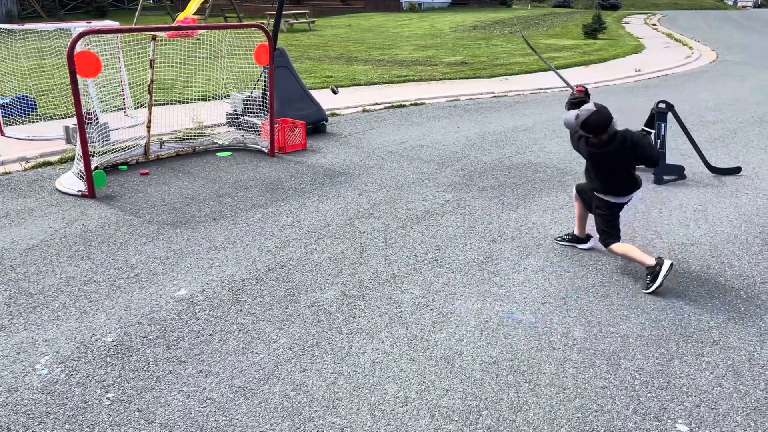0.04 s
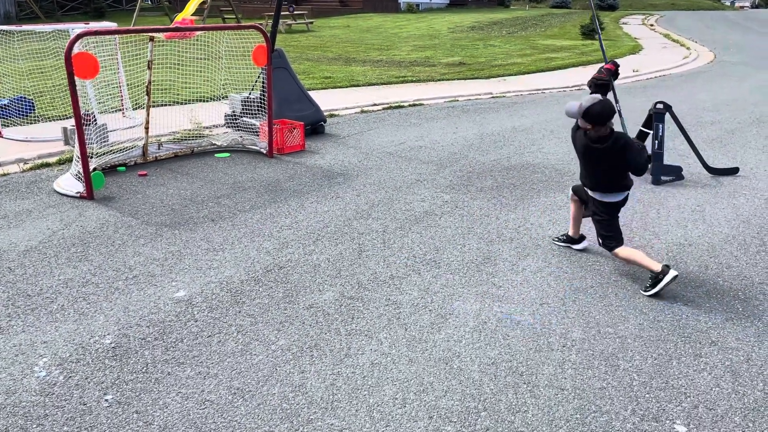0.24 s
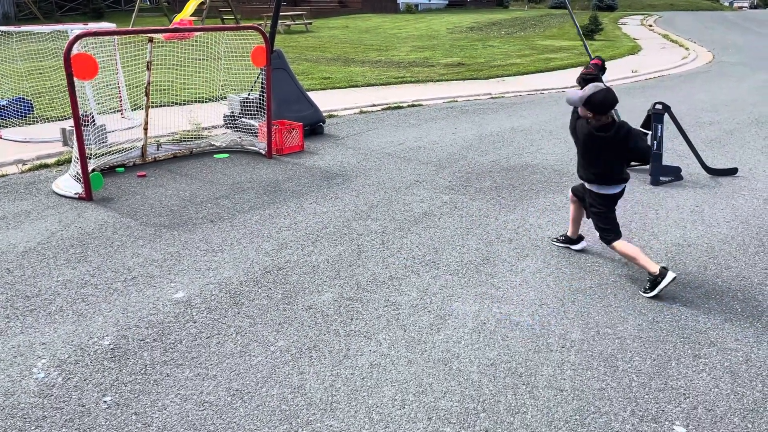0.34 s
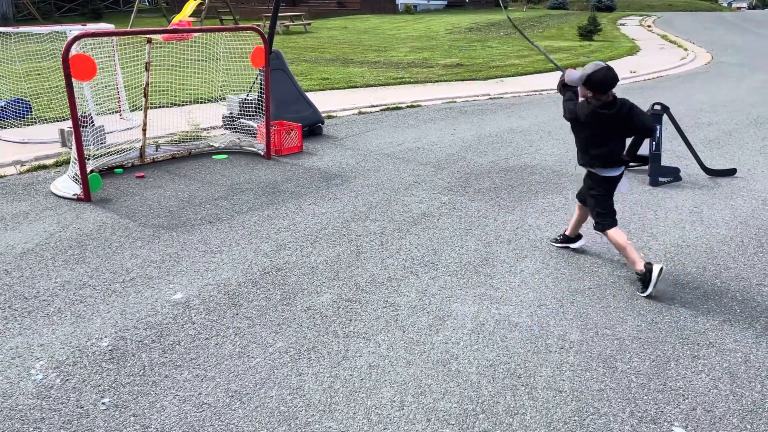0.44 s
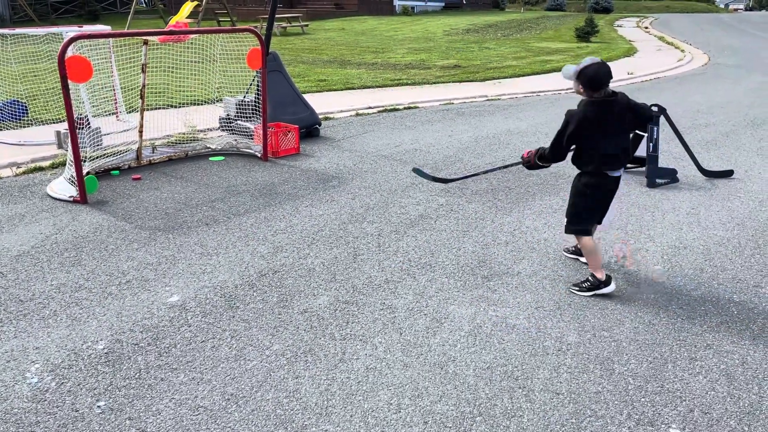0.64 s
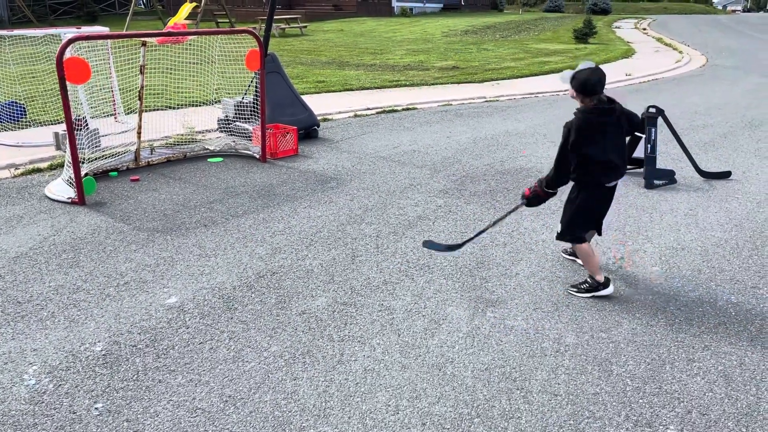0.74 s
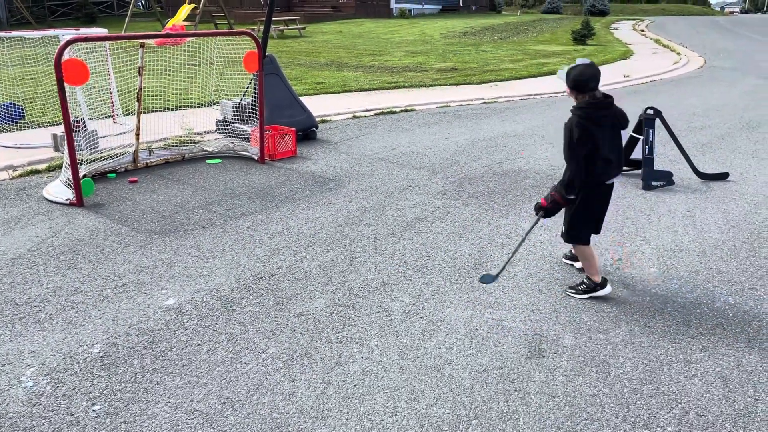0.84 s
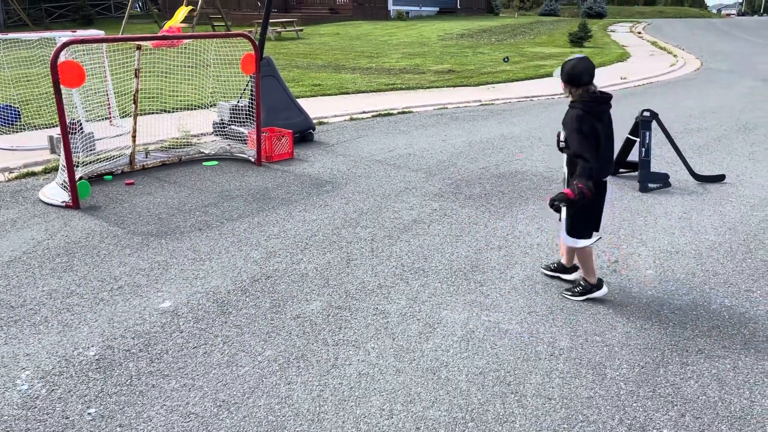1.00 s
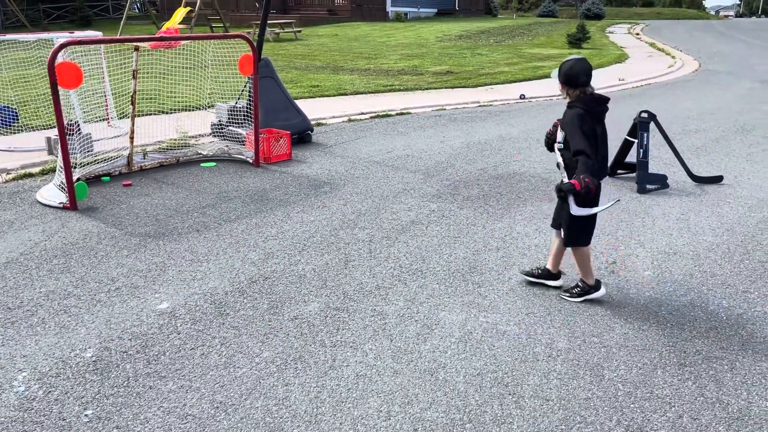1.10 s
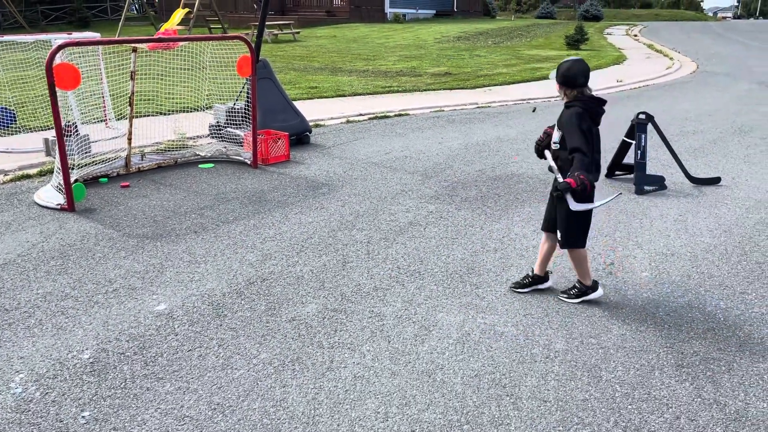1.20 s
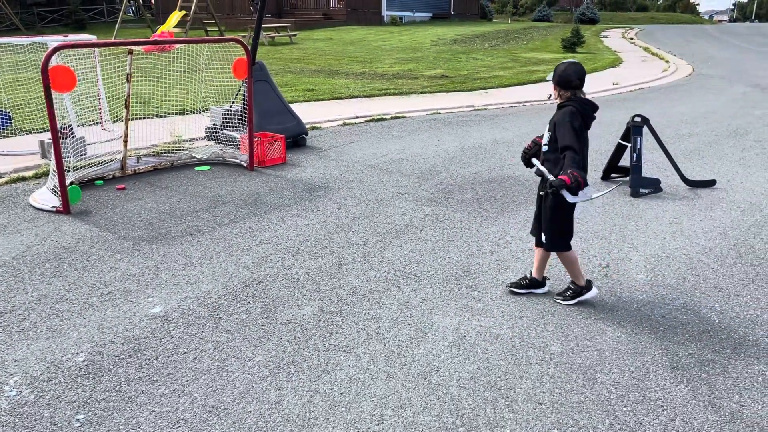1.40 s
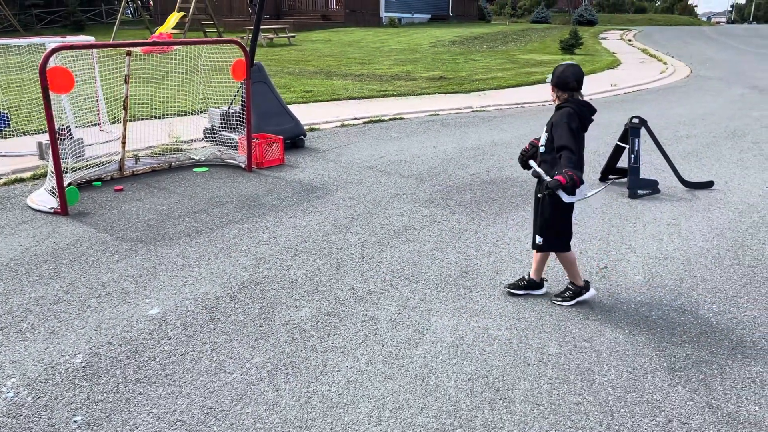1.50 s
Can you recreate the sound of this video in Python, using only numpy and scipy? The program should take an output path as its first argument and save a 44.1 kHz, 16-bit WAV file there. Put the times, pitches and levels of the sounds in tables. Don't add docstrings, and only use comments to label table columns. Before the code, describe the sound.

A hard puck cracks against a steel goal frame with a brief clanky ring and outdoor echo; shoes scuff, then the puck smacks asphalt with a short thump and skitters away over faint distant traffic, in stereo.

```python
import sys
import numpy as np
from scipy import signal
from scipy.fft import rfft, irfft
from scipy.io import wavfile
from scipy.ndimage import uniform_filter1d

SR = 44100
rng = np.random.default_rng(int(sys.argv[2]) if len(sys.argv) > 2 else 0)


def digitize_waveform(pressure):
    field = np.atleast_2d(pressure).T
    bounded = np.clip(field, -1, 1)
    quanta = np.round(bounded * 32767).astype(np.int16)
    wavfile.write(sys.argv[1], SR, quanta)


def natural_amplitude(level_db):
    exponent = np.asarray(level_db, float) / 20
    return 10 ** exponent


N = 68355

# [f/Hz, level/dB per Hz]
TRAFFIC_TONE = [(22, -31), (55, 2.5), (90, -3), (190, -8.5), (320, -17.5), (480, -31), (1200, -42.5),
                (8000, -52.5), (11500, -40), (16000, -73)]
# [t/s, level/dB]
WASH_LEVEL = [(0, -52), (.1, -56.5), (.2, -64), (.24, -36.5), (.29, -49.5), (.4, -48), (.5, -49),
              (.57, -45.5), (.6, -52), (.64, -58), (.8, -66), (.9, -70), (1.06, -77.5), (1.1, -71),
              (1.19, -62), (1.3, -69), (1.55, -66.5)]
# [f/Hz, level/dB per Hz]
WASH_TONE = [(250, -14), (400, -0.5), (2900, 0.5), (5000, -9), (7200, -14), (10500, -22), (12500, -22),
             (16000, -25.5)]
# [f/Hz, correlation]
LIKENESS = [(60, .98), (200, .97), (500, .6), (1000, .3), (12000, .1)]
# [f/Hz, level/dB]
SUM_COLOUR = [(7200, -0.5), (7800, -22), (9100, -19), (9700, -4), (12600, -7), (13600, -28)]
# [f/Hz, level/dB]
DIFFERENCE_COLOUR = [(9600, -0.5), (10500, -24), (13000, -26), (13700, -3), (15700, -7), (16100, -40)]

# [t/s, level/dB, f/Hz, length/s, width/Hz]
SCUFFS = [(0.072, -58, 6000, 0.0025, 6000), (0.212, -58, 3970, 0.01, 5000), (0.217, -29, 3200, .003, 1800),
          (0.302, -50.5, 2780, .024, 800), (0.39, -53, 3560, 0.027, 4020), (.421, -44, 5120, .006, 1200),
          (.422, -39, 2680, 0.01, 2470), (.441, -54, 307, 0.023, 120), (0.461, -47, 2470, 0.014, 500),
          (0.508, -47, 2850, 0.018, 497), (.545, -47.5, 1154, 0.028, 250), (0.611, -42.5, 3100, 0.01, 5800),
          (.615, -43.5, 1400, 0.011, 1383), (0.628, -47, 9500, 0.0034, 9200),
          (.708, -69.5, 11500, 0.00096, 5980), (.752, -60.5, 11000, 0.0087, 2980),
          (.802, -64, 1550, 0.0065, 465), (.803, -66.5, 5980, 0.003, 12260), (0.99, -67, 4395, .003, 4020)]
# [t/s, level/dB, f/Hz, length/s, width/Hz]
HOPS = [(1.087, -58, 1995, 0.0042, 5487), (1.11, -62, 4340, .005, 1614), (1.117, -56.5, 1680, 0.0053, 1180),
        (1.128, -69, 4280, 0.039, 1200), (1.141, -71, 1509, .003, 900), (1.156, -57.5, 1477, 0.0046, 900),
        (1.157, -63, 4820, 0.0036, 2000), (1.1, -65, 1390, 0.017, 900), (1.195, -66, 5680, .01, 1200),
        (1.198, -46.5, 2260, 0.011, 900), (1.203, -37, 2350, .002, 900), (1.241, -53.5, 2400, 0.021, 490),
        (1.292, -63, 2020, 0.007, 600), (1.329, -54, 2100, 0.0095, 700), (1.365, -59, 2467, 0.0042, 700),
        (1.405, -52, 2920, 0.016, 1200), (1.4333, -37.5, 2560, 0.00087, 490),
        (1.434, -43.5, 3480, 0.0015, 403), (1.482, -49.5, 2475, 0.0066, 583),
        (1.495, -58, 2514, 0.017, 740.7)]
# [t/s, level/dB, f/Hz, length/s, width/Hz]
TICKS = [
    (.077, -60, 9000, 0.00097, 9000),
    (.4235, -48, 3060, .002, 900),
    (.4245, -40, 5440, 0.0022, 1000),
    (.632, -58, 11200, 0.00097, 9000),
    (.7195, -62.5, 12030, 0.00072, 4990),
    (.806, -66, 12070, 0.0011, 8000),
    (1.041, -64, 12370, 0.0011, 3950),
]
# [t/s, level/dB, f/Hz, length/s, width/Hz]
SHIMMER = [
    (.235, -58.5, 10840, 0.033, 3000),
    (1.215, -61.5, 11300, 0.053, 2200),
]
# [t/s, level/dB]
SKITTER_LEVEL = [
    (1.21, -67),
    (1.26, -66),
    (1.3, -57.5),
    (1.36, -55),
    (1.41, -49),
    (1.46, -56.5),
    (1.5, -60.5),
    (1.55, -68),
]
# [f/Hz, width/Hz, level/dB]
SKITTER_RINGS = [(2460, 490, -0.5), (3466, 130, -12.5), (4570, 960, -16.5), (7010, 580, -6),
                 (7770, 710, -5.5), (11300, 1700, -13)]

# [f/Hz, level/dB, T60/s]
PUCK_MODES = [(639, -21, 0.013), (775, -21, 0.038), (1653, -2, 0.014), (2260, -2, 0.016),
              (2760, 1.5, 0.015), (3393, -1.5, 0.032), (4765, -13, 0.024), (2303, 1.5, 0.025),
              (6710, 2, 0.021), (7390, -4, 0.011), (10950, -18, 0.02), (11550, -19, 0.041),
              (11530, -14, 0.036), (13300, -17.5, 0.021)]
# [f/Hz, level/dB per Hz]
LAND_CRACK = [(100, -42), (750, 1), (1250, -60), (2300, -30.5), (5200, -32), (7200, -4), (9000, -17.5),
              (15500, -23)]
# [f/Hz, T60/s]
LAND_DIES = [(500, 0.0081), (3000, 0.03), (9500, 0.036), (14000, 0.0077)]
# [f/Hz, phase/rad]
LAND_TURN = [(0, 0), (1700, -.6), (2400, 1.8), (3000, 0), (5000, 0), (10200, -5), (16000, -9.8)]
# [f/Hz, level/dB]
LAND_PAN = [(700, 2), (2400, -1), (4400, 5), (8000, 2)]

# [f/Hz, level/dB, T60/s]
FRAME_MODES = [(320.5, -8.5, 0.078), (521, -8.5, .045), (700, -1.5, 0.041), (788.7, -2.5, 0.07),
               (900, -2.5, .05), (968.5, -1, 0.053), (1124, -10.5, 0.14), (1394, -4.5, 0.13),
               (1645, 1.5, 0.058), (2012, -2.5, 0.052), (172.5, -14, .1), (205, -14.5, 0.095),
               (2100, -1.5, .035), (2329, -4, 0.036), (2364, -4.5, .095), (2557, -2, 0.057),
               (2778, -2.5, 0.062), (2984, -8, 0.072), (3056, -2.5, .055), (3277, -5, 0.041),
               (3512, 1.5, 0.037), (4400, -5, 0.077), (5120, -1, 0.065), (6300, -6.5, 0.013),
               (6870, -8.5, 0.028)]
# [f/Hz, level/dB per Hz]
FRAME_CRACK = [(100, -12.5), (500, -8), (1600, -4), (3000, -2), (3900, -1), (5500, -5.5), (8500, -7.5),
               (12000, -11.5), (15800, -22)]
# [f/Hz, T60/s]
FRAME_DIES = [(120, .18), (400, 0.062), (1200, .09), (3500, 0.048), (7000, .045), (13000, 0.019)]
# [f/Hz, phase/rad]
FRAME_TURN = [(0, 0), (400, .4), (1400, 1.6), (1900, 4.2), (2300, 5.7), (3500, 6.8), (6000, 12.6),
              (8300, 9.4), (11900, 6.3), (15600, 3.1)]
# [f/Hz, level/dB]
FRAME_PAN = [(200, 1), (400, 1), (800, 5), (1300, 7), (2400, 1.5), (8000, 0)]

FRAME_S, LAND_S = 0.22, 1.2070
LEAD_S = 0.01


def evened(x):
    return x / np.sqrt(np.mean(x ** 2) + 1e-20)


def read(points, hz):
    f, value = np.transpose(points)
    return np.interp(np.log(hz + 1), np.log(f + 1), value)


def level(curve):
    s, db = np.transpose(curve)
    return natural_amplitude(np.interp(np.arange(N) / SR, s, db))


def add(mix, s, sound):
    part = mix[:, round(s * SR):][:, :sound.shape[1]]
    part += sound[:, :part.shape[1]]


def ring(x, hz, width):
    r = np.exp(-np.pi * width / SR)
    pole = r * np.exp(2j * np.pi * hz / SR)
    return 2 * signal.lfilter([(1 - r) ** 2], np.poly([pole, pole]), x + 0j).real


def hiss(tone, patchy_db, flicker_db, size):
    frames, hz = 4 * N // size + 5, np.fft.rfftfreq(size, 1 / SR)
    a, b, c, d, patches = rng.standard_normal((frames, len(hz), 5)).T
    flicker = evened(uniform_filter1d(patches[9], size=3))
    patches = uniform_filter1d(patches, size=6, axis=0)
    patches = evened(uniform_filter1d(patches, size=8, axis=1))
    same = np.clip(read(LIKENESS, hz), -1, 1)[:, None]
    left = a + 1j * b
    right = same * left + np.sqrt(1 - same ** 2) * (c + 1j * d)
    gain = natural_amplitude(read(tone, hz)[:, None] + patchy_db * patches + flicker_db * flicker)
    spectra = np.array([left, right]) * gain
    return evened(signal.istft(spectra, nperseg=size, noverlap=size - size // 4)[1][:, :N])


def traffic():
    return natural_amplitude(-50.5) * hiss(TRAFFIC_TONE, 4.4, 0.71, size=2048)


def wash():
    return level(WASH_LEVEL) * hiss(WASH_TONE, 2.6, 1.5, size=512)


def yard(x):
    t = np.arange(SR // 2) / SR
    density, t60_s, first_echo_s = 0.05, 0.3, 0.008
    taps = rng.standard_normal((2, len(t))) * (rng.random((2, len(t))) < density)
    taps = taps * natural_amplitude(-60 * t / t60_s) * (t > first_echo_s)
    taps = signal.lfilter([1], [1, -0.15], taps)
    return natural_amplitude(-38.5) * signal.fftconvolve(x, taps / np.linalg.norm(taps[0]), axes=1)[:, :N]


def spread(x):
    hz = np.fft.rfftfreq(N, 1 / SR)
    mid = rfft(x[0] + x[1]) * natural_amplitude(read(SUM_COLOUR, hz))
    side = rfft(x[0] - x[1]) * natural_amplitude(read(DIFFERENCE_COLOUR, hz))
    return irfft(np.array([mid + side, mid - side]) / 2, N)


def scuffs(rows, tail_s, size):
    out, t = np.zeros((2, N)), np.arange(size) / SR
    for s, db, hz, length, width in rows:
        crackle = natural_amplitude(1.9 * np.minimum(rng.exponential(1, size), 4))
        force = rng.standard_normal((3, size)) * crackle
        shape = np.minimum(t / 0.00034, 1) * np.exp(-np.maximum(t - length, 0) / tail_s)
        burst = evened(ring(force[:2] + 0.66 * force[2], hz, width))
        add(out, s, natural_amplitude(db) * shape * burst)
    return out


def skitter():
    clicks_per_s = 6000
    uneven = natural_amplitude(1.6 * np.minimum(rng.exponential(1, N), 4))
    grit = rng.standard_normal((3, N)) * uneven * (rng.random(N) < clicks_per_s / SR)
    force = grit[:2] + 0.46 * grit[2]
    body = sum(natural_amplitude(db) * evened(ring(force, hz, width)) for hz, width, db in SKITTER_RINGS)
    return evened(body) * level(SKITTER_LEVEL) * (np.arange(N) > LAND_S * SR)


def thump():
    t = np.arange(6000) / SR
    start_hz, sag_hz_per_s, rise_s, t60_s = 206.6, 930, 0.0099, 0.128
    cycles = np.cumsum(np.maximum(start_hz - sag_hz_per_s * t, 60)) / SR
    envelope = np.minimum(t / rise_s, 1) * natural_amplitude(-37 - 60 * t / t60_s)
    return envelope * np.sin(2 * np.pi * cycles) * np.ones((2, 1))


def ports(x, turn, pan):
    hz = np.fft.rfftfreq(len(x), 1 / SR)
    side = natural_amplitude(read(pan, hz) / 2) * np.exp(0.5j * np.interp(hz, *np.transpose(turn)))
    return irfft(rfft(x) * np.array([side, 1 / side]), len(x))


def chatter(modes, push_s, snap, rise_s):
    v = np.arange(1200) / SR
    in_tune = 0.35
    mode_hz = np.transpose(modes)[0][:, None]
    step = np.cos(2 * np.pi * (mode_hz * v + rng.random((len(modes), 1))))
    push = rng.standard_normal((len(modes), 1200)) + in_tune * step
    push = push * np.exp(-3 * v / push_s) * np.minimum(v / rise_s, 1)
    return push / np.linalg.norm(push, axis=1)[:, None] + snap * (v == 0)


def modal_ring(modes, pushes, u):
    rings = 0
    for push, (f, mode_db, t60) in zip(pushes, modes):
        onset = np.minimum(u * f / 1.7, 1) ** 2
        response = onset * natural_amplitude(-60 * u / t60) * np.sin(2 * np.pi * f * u)
        mode = signal.oaconvolve(push, response)[:len(u)]
        rings = rings + natural_amplitude(mode_db) * mode / abs(mode).max()
    return rings


def crack_noise(tone, dies, rise_s, u):
    hz = np.fft.rfftfreq(len(u), 1 / SR)
    noise = rfft(rng.standard_normal(len(u))) * natural_amplitude(read(tone, hz))
    noise = noise / np.std(irfft(noise))
    crack = 0
    for c in 100 * 2 ** (np.arange(16) / 2):
        band = irfft(noise * np.maximum(1 - abs(2 * np.log2((hz + 1) / c)), 0))
        onset = np.minimum(u / (rise_s + 2 / c), 1) ** 2
        crack = crack + band * onset * natural_amplitude(-60 * u / read(dies, c))
    return crack


def strike(modes, db, push_s, snap, tone, dies, crack_db, rise_s):
    u = np.maximum(np.arange(16384) / SR - LEAD_S, 0)
    rings = modal_ring(modes, chatter(modes, push_s, snap, rise_s), u)
    return natural_amplitude(db) * rings + natural_amplitude(crack_db) * crack_noise(tone, dies, rise_s, u)


def landing():
    land = strike(PUCK_MODES, -16.5, push_s=0.006, snap=4.0, tone=LAND_CRACK, dies=LAND_DIES,
                  crack_db=-13.5, rise_s=0.0006)
    return ports(land, LAND_TURN, LAND_PAN)


def frame_hit():
    frame = strike(FRAME_MODES, -18.5, push_s=0.0036, snap=0.49, tone=FRAME_CRACK,
                   dies=FRAME_DIES, crack_db=-6, rise_s=0.0028)
    return ports(frame, FRAME_TURN, FRAME_PAN)


def scene():
    hits = np.zeros((2, N))
    add(hits, FRAME_S - LEAD_S, frame_hit())
    add(hits, LAND_S - LEAD_S, landing())
    add(hits, LAND_S, thump())
    scattered = traffic() + wash() + yard(hits) + skitter()
    scattered = scattered + scuffs(SCUFFS + HOPS, tail_s=0.0055, size=3000)
    scattered = scattered + scuffs(SHIMMER, tail_s=0.09, size=14000)
    return hits + spread(scattered) + scuffs(TICKS, tail_s=0.0012, size=800)


def roll_off(x):
    return signal.sosfilt(signal.butter(12, 16530, fs=SR, output="sos"), x)


def record(dry):
    low_cut = signal.butter(2, 40, "high", fs=SR, output="sos")
    high_cut = signal.butter(10, 16300, fs=SR, output="sos")
    cut = signal.sosfilt(low_cut, dry)
    cut = signal.sosfiltfilt(high_cut, cut)
    mix = np.tanh(cut * 1.129) / 0.98
    return roll_off(mix)


dry = scene()
out = record(dry)
digitize_waveform(out)
```